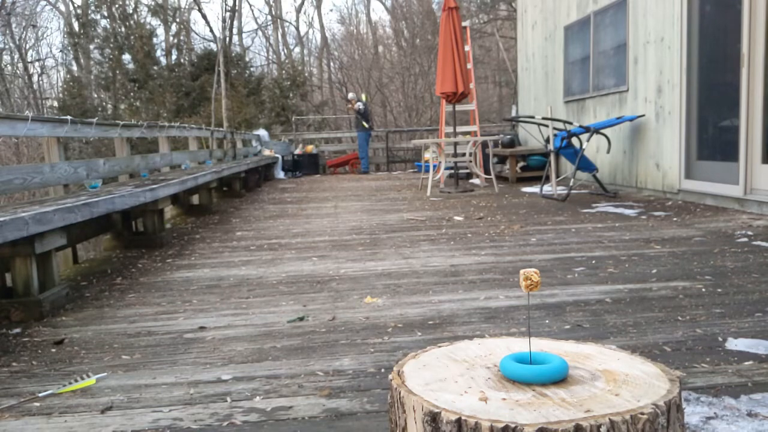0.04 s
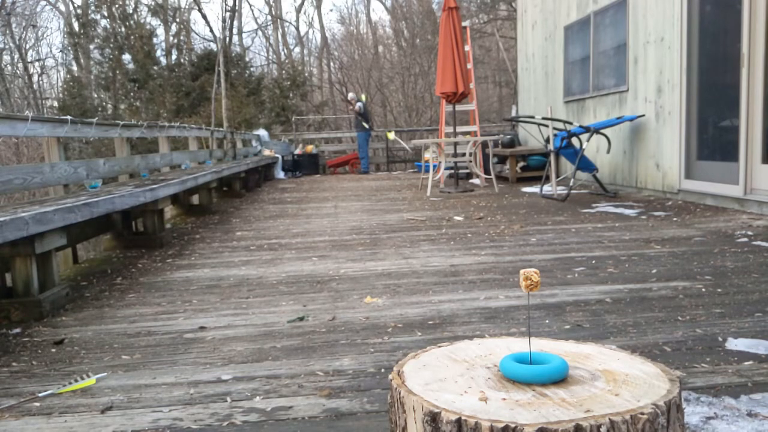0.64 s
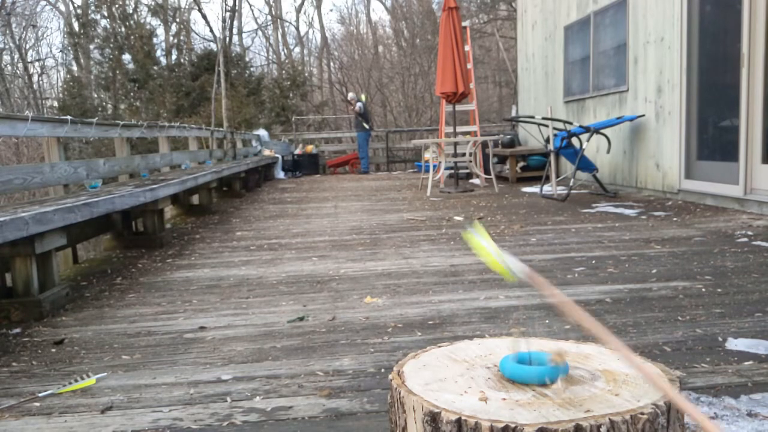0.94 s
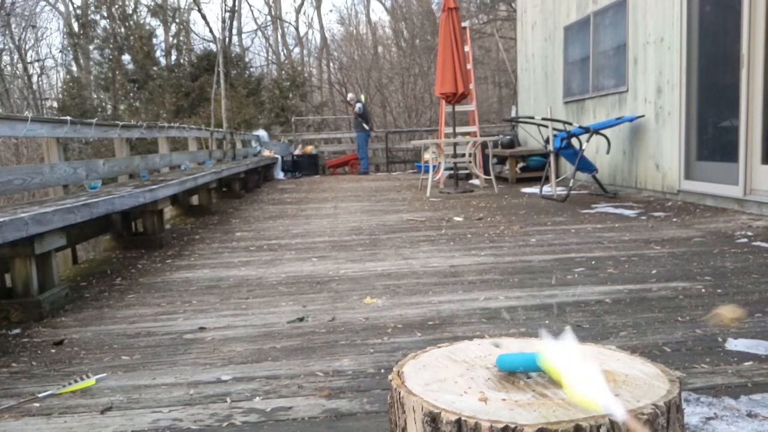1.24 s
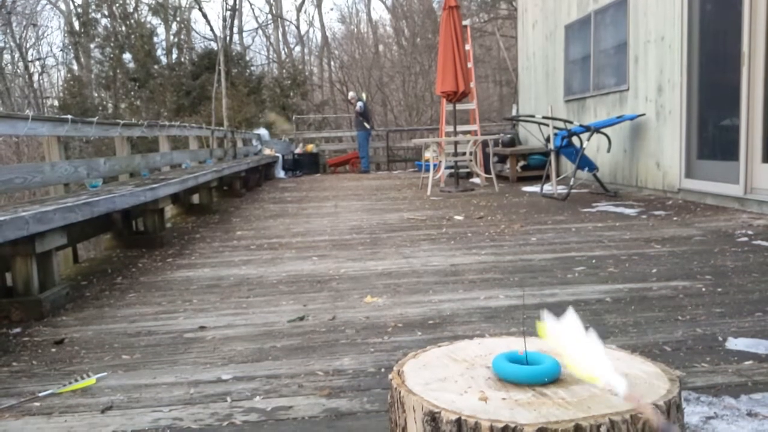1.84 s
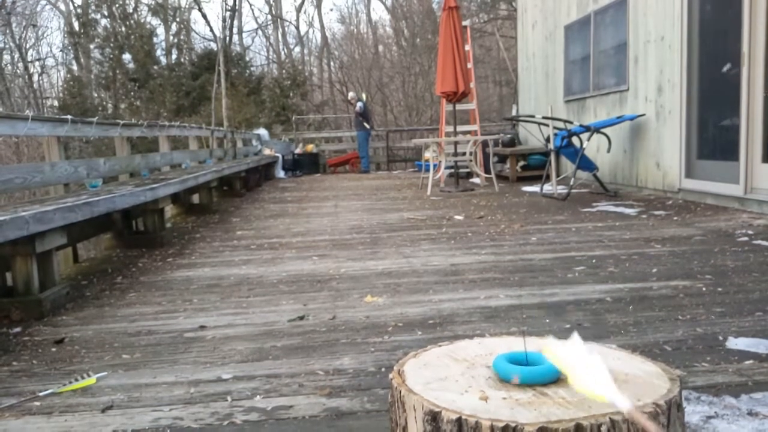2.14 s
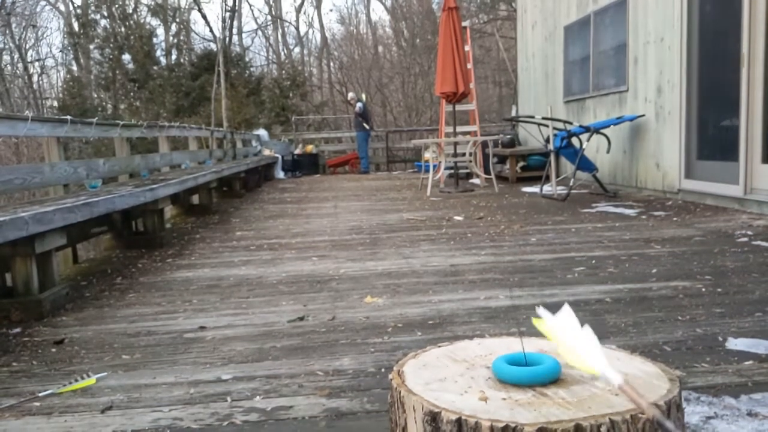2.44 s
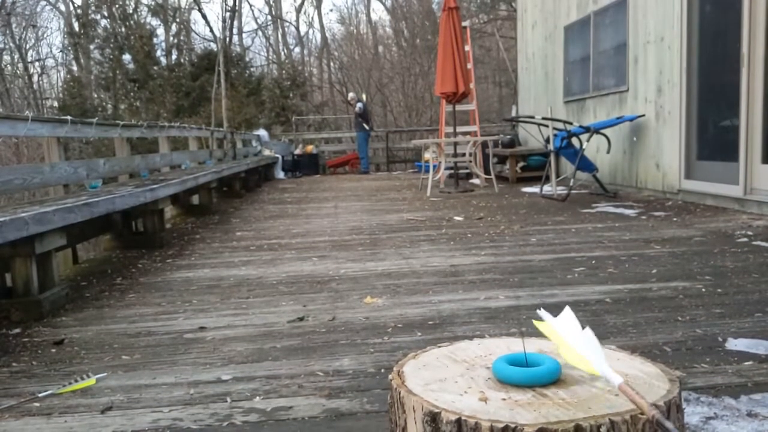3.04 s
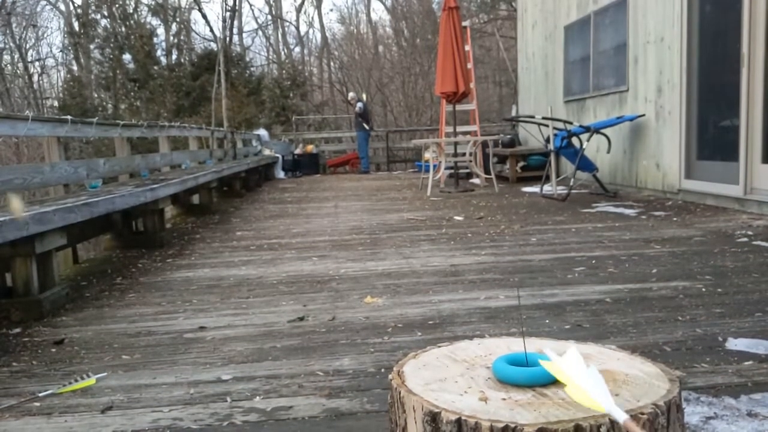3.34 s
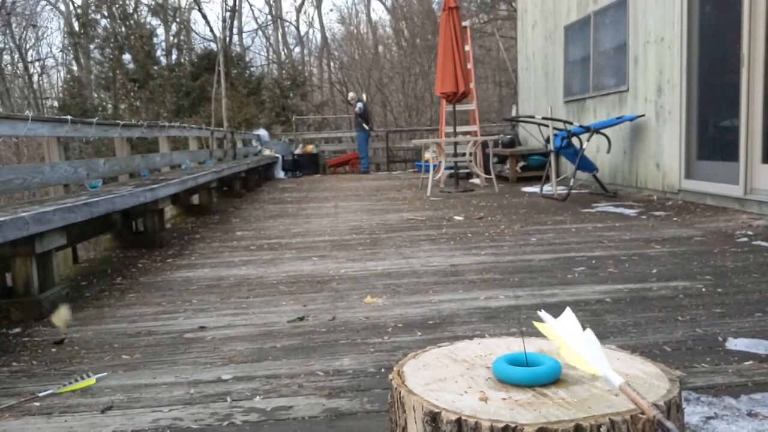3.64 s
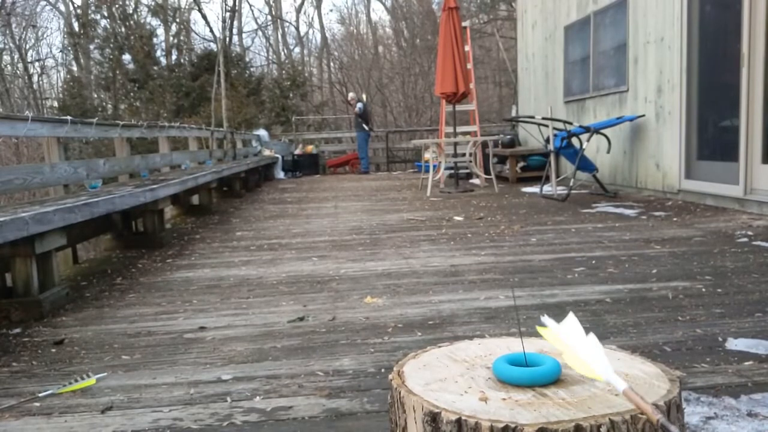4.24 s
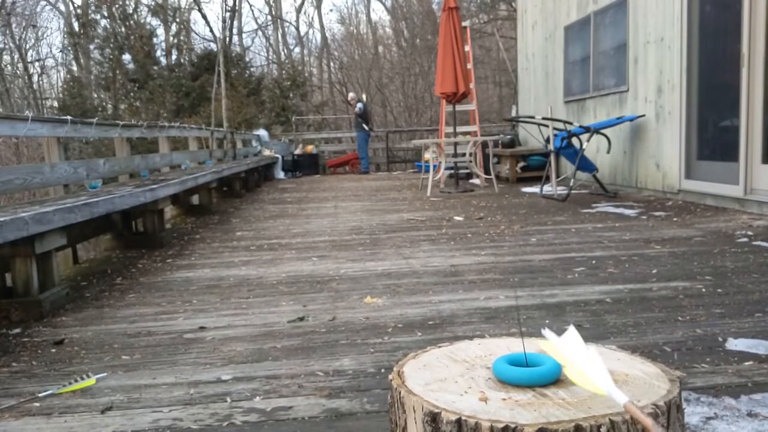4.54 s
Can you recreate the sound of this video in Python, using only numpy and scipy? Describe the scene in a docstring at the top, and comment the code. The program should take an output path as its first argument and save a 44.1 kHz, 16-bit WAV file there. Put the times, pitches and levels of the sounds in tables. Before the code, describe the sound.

Close, dull, slowed-down crack and heavy thump of an arrow striking wood, followed by debris clattering and ticking on a deck.

```python
"""Feathers rush in over faint outdoor air, and an arrow cracks into a log stump on a wooden deck. It is close
up and in slow motion, so nearly everything is deep and dull. Fibres crunch as the point sinks in, the shaft
hums and slaps, and a deep thump rolls through. Bits of the shattered target then knock and skitter on the
boards, the knocks trailing a soft echo from the yard, while thin bright ticks flicker above."""
import sys
import numpy as np
from scipy import signal
from scipy.fft import rfft, irfft
from scipy.io import wavfile

SR = 44100
rng = np.random.default_rng(int(sys.argv[2]) if len(sys.argv) > 2 else 0)


def int16_out(signal):
    """Quantize to a 16-bit WAV file."""
    q = np.round(np.clip(np.atleast_2d(signal).T, -1, 1) * 32767)
    wavfile.write(sys.argv[1], SR, q.astype(np.int16))


N = 211194
TIME = np.arange(N) / SR
FREQ = np.fft.rfftfreq(N, 1 / SR) + 1e-3
DULL_HZ = 2130  # top of the slow-motion low band
IMPACT_S, STOP_S = 1.268, 1.424  # the point meets the wood, then comes to rest


def undb(db):
    """Decibels to gain."""
    return 10 ** (np.asarray(db) / 20)


def decay(t, t60):
    """Exponential fall from t = 0, silent before."""
    return (t >= 0) * np.exp(-np.log(1000) * np.abs(t) / t60)


def swell(t, rise_s):
    """Smooth fade-in from t = 0."""
    return 1 - np.exp(-(np.maximum(t, 0) / rise_s) ** 2)


def envelope(start, attack_s, hold_s, t60):
    """Attack, hold and exponential release."""
    return swell(TIME - start, attack_s) * decay(np.maximum(TIME - start - hold_s, 0), t60)


def build(peak_s, db_per_s):
    """Crescendo that reaches full gain at the peak and stays there."""
    return undb(db_per_s * np.minimum(TIME - peak_s, 0))


def pan(pan_db):
    """Equal-power stereo gains; pan is left minus right in dB."""
    gain = undb(np.array([[pan_db], [-pan_db]]) / 2)
    return gain / np.sqrt(np.mean(gain ** 2))


def equalise(x, curve):
    """EQ through a curve of (frequency [Hz], gain [dB]) points."""
    hz, db = np.transpose(curve)
    return irfft(rfft(x) * undb(np.interp(np.log(FREQ), np.log(hz), db)), N)


def dull(x, hz, order):
    """Low-pass, steeper with higher order."""
    return irfft(rfft(x) / np.sqrt(1 + np.minimum(FREQ / hz, 10) ** (2 * order)), N)


def unit(x):
    """Normalise to rms 1 within the low band."""
    return x / np.std(dull(x, DULL_HZ, order=20))


def add(out, start, sound):
    """Mix a short sound in at a start time in seconds."""
    i = int(start * SR)
    out[:, i:i + sound.shape[1]] += sound[:, :N - i]


# Tone of the outdoor air: (frequency [Hz], relative level [dB])
AIR_EQ = [(15, -34), (40, -42.5), (80, -46), (150, -49.5), (250, -53), (420, -50.5), (700, -56.5),
          (1000, -61.5), (1500, -64), (2100, -61.5)]

def air(level_db=-50, pan_db=-2.5, shared_hz=200, shared=0.33, waver_db=1.5):
    """A soft, wavering bed of outdoor rumble; left and right share some of the bass."""
    noise = rng.standard_normal((2, N))
    noise += shared * dull(noise.mean(axis=0) - noise, shared_hz, order=1)
    waver = unit(dull(rng.standard_normal(N), hz=13, order=2))
    return unit(equalise(noise, AIR_EQ)) * pan(pan_db) * undb(level_db + waver_db * waver)


def deck_rumble(level_db=-29, attack_s=0.005, hold_s=0.076, t60=2.5, top_hz=38, width_db=-8):
    """The deck shudders from the blow on: a long sub-bass tail, nearly mono."""
    noise = rng.standard_normal(N) + undb(width_db) * rng.standard_normal((2, N))
    return undb(level_db) * envelope(IMPACT_S, attack_s, hold_s, t60) * unit(dull(noise, top_hz, order=3))


# Tone of the yard's echo: (frequency [Hz], relative level [dB])
ECHO_EQ = [(40, -12), (150, 0), (450, -1), (800, -0.5), (1300, -5), (2100, -6)]

def yard_echo(x, wet_db=-19, t60=0.68, rise_s=0.0047):
    """Deck, wall and trees scatter a soft reverb tail."""
    tail = unit(equalise(rng.standard_normal((2, N)), ECHO_EQ)) * swell(TIME, rise_s) * decay(TIME, t60)
    energy = np.sum(dull(tail[0], DULL_HZ, order=20) ** 2)
    tail *= np.sqrt(2 * DULL_HZ / SR / energy)  # unity gain over the low band
    return undb(wet_db) * signal.fftconvolve(x.mean(axis=0)[None], tail, axes=1)[:, :N]


# Bright ticks: (time [s], level before EQ [dB])
TICK_CUES = [(1.279, -26.5), (1.322, -29.5), (1.4075, -33), (1.450, -29), (1.493, -39), (1.578, -42.5),
             (2.218, -23.5), (2.772, -49), (3.625, -51), (4.011, -52.5)]
# Their tone: (frequency [Hz], gain [dB])
TICK_EQ = [(2000, 9), (4000, 2), (8000, -1.5), (12000, -5.5)]

def ticks(fizz_db=-29, stray_per_s=14, stray_db=-68, scatter_db=4, pan_db=-3, pan_spread_db=3):
    """Thin, dry clicks and a sprinkle of weaker strays: the only bright layer."""
    strays = rng.random(N) < stray_per_s / SR
    out = strays * undb(stray_db + scatter_db * rng.standard_normal((2, N)))
    t = TIME[:SR // 4]
    for start, db in TICK_CUES:
        click = (t == 0) + undb(fizz_db) * rng.standard_normal((2, len(t))) * decay(t, t60=0.02)
        add(out, start, undb(db) * pan(pan_db + pan_spread_db * rng.standard_normal()) * click)
    return equalise(out, TICK_EQ)


# Tone of breaking wood fibres: (frequency [Hz], relative level [dB])
FIBRE_EQ = [(40, -5.5), (150, -0.5), (260, -6.5), (450, -1.5), (720, -4), (1050, -8), (1500, -7),
            (1800, -7), (2100, 0.5)]

def wood_grains(grains_per_s=900, scatter_db=3, bass_hz=380, treble_hz=1300, top_hz=2250, pan_db=-2):
    """Dense tiny fractures of uneven size, coloured by the wood and split into bass, mids and treble."""
    size = undb(scatter_db * np.minimum(rng.exponential(size=(2, N)), 3)) * rng.choice([-1, 1], (2, N))
    fractures = size * (rng.random((2, N)) < grains_per_s / SR)
    texture = pan(pan_db) * unit(equalise(fractures, FIBRE_EQ))
    bass, body = dull(texture, bass_hz, order=3), dull(texture, treble_hz, order=3)
    return bass, body - bass, dull(texture, top_hz, order=6) - body


# Showers of crumbs: (time [s], level [dB], hold [s], t60 [s], bass gain [dB], treble gain [dB])
CRUMB_CUES = [(1.798, -49.5, 0.19, 1, 2.5, 2), (2.752, -43.5, 0.1, 0.59, 5.5, -17),
              (2.922, -51.5, 0.054, 0.14, -4, 0.5), (3.45, -49.5, 0.037, 0.14, -8.5, -0.5),
              (3.83, -60.5, 0.17, 0.32, 8.5, -4)]

def crumbs(attack_s=0.0083):
    """Each shower of crumbs skitters over the boards for a moment and fades."""
    bass, mids, treble = wood_grains()
    out = np.zeros((2, N))
    for start, db, hold_s, t60, bass_db, treble_db in CRUMB_CUES:
        rattle = undb(bass_db) * bass + mids + undb(treble_db) * treble
        out += undb(db) * envelope(start, attack_s, hold_s, t60) * rattle
    return out


def clack(ring_db, hz, t60, crack_db, pan_db, crack_t60_ratio=0.67, crack_q=0.83, ring_width_hz=35):
    """One wooden contact: a short, rough resonance inside a broad crack."""
    t = TIME[:SR // 2]
    f = np.fft.rfftfreq(len(t), 1 / SR) + 1
    lag_s = np.clip(0.48 * np.array([[-pan_db], [pan_db]]), 0, 0.002)  # the far side hears it later
    age = t - lag_s
    # a loose contact makes the phase wander, roughening the ring
    wander = np.cumsum(rng.standard_normal(age.shape), axis=1) * np.sqrt(2 * np.pi * ring_width_hz / SR)
    ring = np.sin(2 * np.pi * hz * age + wander) * swell(age, rise_s=0.0017) * decay(age, t60)
    band = (f < DULL_HZ) / np.hypot(1, crack_q * (f / hz - hz / f))
    shape = swell(age, rise_s=0.0016) * decay(age, t60 * crack_t60_ratio)
    crack = irfft(rfft(rng.standard_normal(age.shape)) * band, len(t)) * shape
    crack *= np.sqrt(np.sum(shape ** 2, axis=1) / np.sum(crack ** 2, axis=1))[:, None]
    return pan(pan_db) * (undb(ring_db) * ring + undb(crack_db) * crack)


def chips(count=9, first_s=3.2, ring_db=-57, crack_db=-54, hz=1800, t60=0.086,
          scatter_db=3, pan_spread_db=5):
    """The last small chips come down here and there with light, high clacks."""
    out = np.zeros((2, N))
    starts = first_s + (TIME[-1] - first_s) * (np.arange(count) + rng.random(count)) / count
    for start, (size, detune, side) in zip(starts, rng.standard_normal((count, 3))):
        db, chip_hz = scatter_db * size, hz * np.exp(0.1 * detune)
        add(out, start, clack(ring_db + db, chip_hz, t60, crack_db + db, pan_spread_db * side))
    return out


# Modes of the deck boards: (frequency [Hz], relative level [dB], base t60 [s])
BOARD_MODES = [(76, -3.5, 0.14), (129.5, -3.5, 0.084), (296, -3.5, 0.073), (313.3, -12, 0.11),
               (393.3, -3.5, 0.14), (507.6, -2, 0.068), (524.7, -9.5, 0.21), (729, -1, 0.077),
               (800, -24.5, 0.022), (1010, -9.5, 0.16), (1073, -2.5, 0.0184), (1264, -6.5, 0.006),
               (1430, -13.5, 0.046), (1470, -5.5, 0.12)]
# Fragments landing: (time [s], level [dB], t60 scale [ratio], low cut [Hz], high cut [Hz], pan [dB])
KNOCK_CUES = [ (2.172, -36, 3.4, 220, 1700, -3), (2.2164, -12, 0.81, 50, 1380, -14),
              (2.2279, -18.5, 0.99, 50, 800, -4.5), (2.257, -23, 1.7, 600, 800, -5.5),
              (2.771, -37, 1.9, 250, 1470, -1.5), (2.815, -42, 4.2, 150, 650, -8),
              (2.8809, -13, 0.11, 380, 1840, -18), (2.8841, -14, 0.12, 377, 1760, -40.5),
              (4.5486, -27.5, 0.1, 176, 1480, 1), (4.560, -33.5, 1.3, 250, 530, -6.5)]

def board_knocks(rise_s=0.00051, phase_spread=0.95, clatter_db=-4, base_clatter_t60=0.16, preroll_s=0.02):
    """A landing rings the main modes and a blur of lesser ones; weight and hardness set band and decay."""
    out, t = np.zeros((2, N)), TIME[:SR]
    f = np.fft.rfftfreq(len(t), 1 / SR) + 1
    age = t - preroll_s
    for start, db, t60_scale, low_hz, high_hz, pan_db in KNOCK_CUES:
        clatter = unit(rng.standard_normal((2, N)))[:, :SR]
        ring = undb(clatter_db) * clatter * decay(age, base_clatter_t60 * t60_scale)
        for hz, mode_db, t60 in BOARD_MODES:
            phase = phase_spread * rng.standard_normal((2, 1))
            ring += undb(mode_db) * np.sin(2 * np.pi * hz * age + phase) * decay(age, t60 * t60_scale)
        band = (f < DULL_HZ) / np.sqrt((1 + (low_hz / f) ** 6) * (1 + (f / high_hz) ** 8))
        knock = irfft(rfft(ring * swell(age, rise_s)) * band)
        add(out, start - preroll_s, undb(db) * pan(pan_db) * knock)
    return out


def feather_rush(rush_db=-53, near_s=0.18, draught_db=-40, draught_hz=40, release_t60=0.2):
    """The feathers whoosh louder as the arrow closes in; its deep draught arrives at the last moment."""
    release = decay(np.maximum(TIME - IMPACT_S, 0), release_t60)
    nearness = release / np.hypot(1, np.maximum(IMPACT_S - TIME, 0) / near_s)
    rush = unit(dull(rng.standard_normal((2, N)), DULL_HZ, order=20))
    draught = unit(dull(rng.standard_normal((2, N)), draught_hz, order=3))
    return undb(rush_db) * nearness * rush + undb(draught_db) * nearness ** 4 * draught


# Bending modes of the stuck shaft: (frequency [Hz], relative level [dB], free t60 [s])
SHAFT_MODES = [(96.6, -31, 0.86), (139.3, -15, 0.36), (190.8, -14.5, 0.29), (250, -9, 0.074),
               (312.3, -24, 0.56), (379, -26.5, 0.84), (447, -32, 0.64), (530, -35, 0.084),
               (960, -25, 0.39), (1153, -33.5, 1), (1426, -28, 0.54)]

def shaft_hum(start_s=1.279, gain_db=7.5, rise_s=0.031, pan_db=-4, free_s=0.24, grip_t60=0.65):
    """The stuck shaft hums until the wood's grip damps it."""
    out, t = np.zeros((2, N)), TIME[:SR]
    hum = sum(undb(db) * np.sin(2 * np.pi * hz * t + rng.standard_normal((2, 1))) * decay(t, t60)
              for hz, db, t60 in SHAFT_MODES)
    grip = decay(np.maximum(t - free_s, 0), grip_t60)
    add(out, start_s, undb(gain_db) * pan(pan_db) * hum * swell(t, rise_s) * grip)
    return out


def fibre_crunch(attack_s=0.004, build_db_per_s=36):
    """Fibres split from the impact on, gaining body as the point sinks and dying away once it stops."""
    def layer(band, db, t60):
        return band * undb(db) * envelope(IMPACT_S, attack_s, STOP_S - IMPACT_S, t60)

    bass, mids, treble = wood_grains()
    depth = build(STOP_S, build_db_per_s)
    body = layer(bass, db=-15, t60=0.68) + layer(mids, db=-17, t60=0.74)
    return depth * body + layer(treble, db=-26, t60=0.82)


def stump_thump(start_s=1.372, attack_s=0.015, peak_s=1.462, t60=0.31, level_db=-5.5, build_db_per_s=85,
                first_hz=100, last_hz=13, octaves_per_s=24, pan_db=4.5, flutter_db=-16, flutter_hz=50):
    """The blow heaves the stump and the nearby air: a few deep swings that grow, slow down and fade."""
    hz = np.maximum(first_hz * 2 ** (-octaves_per_s * np.maximum(TIME - start_s, 0)), last_hz)
    swing = np.sin(2 * np.pi * np.cumsum(hz * (TIME >= start_s)) / SR)
    flutter = unit(dull(rng.standard_normal((2, N)), flutter_hz, order=3))
    shape = envelope(start_s, attack_s, peak_s - start_s, t60) * build(peak_s, build_db_per_s)
    return undb(level_db) * pan(pan_db) * shape * (swing + undb(flutter_db) * flutter)


# Arrow and fragment hits: (time [s], ring level [dB], pitch [Hz], t60 [s], crack level [dB], pan [dB])
STRIKE_CUES = [ (1.264, -16.5, 126, 0.069, -25.5, 3.5), (1.2715, -11, 757, 0.03, -15, 4),
               (1.272, -18, 1810, 0.042, -8.5, -1), (1.3315, -6, 2026, 0.029, 0, 13.5),
               (1.345, -14, 1100, .069, -13, -14), (1.381, -2, 522, 0.032, -9.5, -0.5),
               (1.399, -19.5, 886, .033, -3.5, -9.5), (1.406, -11.5, 1970, 0.049, -17, 7),
               (1.4255, 2, 714, 0.052, -22, 4), (1.4385, -11.5, 690, 0.098, -25, -1),
               (1.500, -20.5, 698, 0.13, -40.5, -6), (1.5407, -4, 755, 0.034, -15.5, 3),
               (1.608, -10.5, 2056, 0.031, -17.5, 2.5), (1.882, -29, 723, .045, -30.5, -0.5),
               (2.053, -29, 1692, 0.026, -29.5, 6), (2.137, -52, 1900, 0.27, -35, -7),
               (2.174, -34, 2142, 0.14, -27.5, -3), (2.190, -21, 1678, 0.083, -27, -4),
               (2.232, -35, 2062, 0.24, -33, 4.5), (2.706, -36, 2056, 0.021, -33.5, 8),
               (2.750, -33, 2016, 0.12, -32.5, 31.5), (2.752, -23.5, 800, 0.093, -26.5, 0),
               (2.8795, -12, 726, 0.033, -23.5, -34), (2.880, -15, 1340, 0.028, -29, -19.5),
               (2.886, -30, 1976, 0.033, -31, -10), (3.203, -40.5, 1436, 0.033, -45, -7),
               (3.444, -40, 1788, 0.16, -41.5, 2.5), (3.615, -39.5, 1930, 0.12, -42.5, 7),
               (3.963, -28.5, 740, 0.03, -43.5, -3.5), (4.006, -38, 2040, .021, -41, -3),
               (4.548, -27.5, 1160, 0.031, -38, 2.5), (4.558, -30, 162, 0.13, -47, -0.5)]

def strikes():
    """The point cracks in, the shaft slaps, and the larger fragments hit the deck."""
    out = np.zeros((2, N))
    for start, *contact in STRIKE_CUES:
        add(out, start, clack(*contact))
    return out


def scene():
    """Mix flight, impact and debris over the air; only the ringing wood feeds the echo."""
    wood = strikes() + board_knocks() + shaft_hum() + chips()
    return (feather_rush() + wood + yard_echo(wood) + fibre_crunch() + crumbs()
            + stump_thump() + deck_rumble() + air())


def record(dry, ceiling=0.91, knee=0.62, grit=0.59, grit_hz=2900, skirt_db=-36, skirt_hz=2500,
           hiss_db=-95, top_hz=12700):
    """Slow motion leaves a weak skirt and ticks above the low band, over a faint hiss; peaks overload with
    grit."""
    rounded = ceiling * np.tanh(dry / ceiling)
    low_band = dull(rounded, DULL_HZ, order=150)
    overload = dull(low_band - np.clip(low_band, -knee, knee), grit_hz, order=16)
    skirt = undb(skirt_db) * dull(rounded, skirt_hz, order=5)
    mix = low_band - grit * overload + skirt + ticks() + undb(hiss_db) * rng.standard_normal((2, N))
    return signal.sosfilt(signal.ellip(8, 0.2, 70, top_hz, fs=SR, output="sos"), mix)


dry = scene()
out = record(dry)
int16_out(out)
```